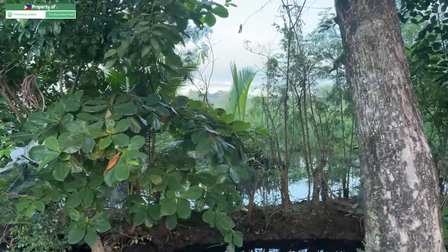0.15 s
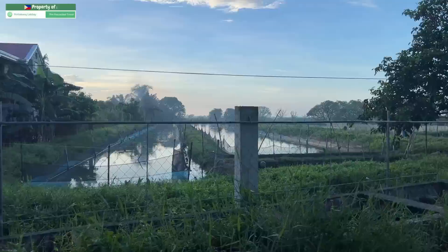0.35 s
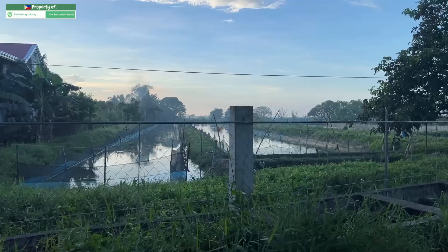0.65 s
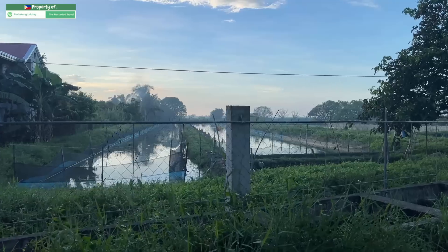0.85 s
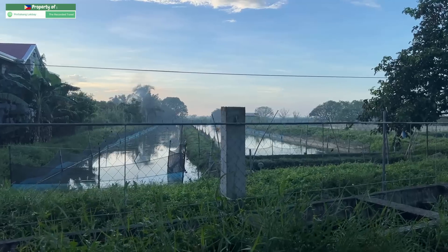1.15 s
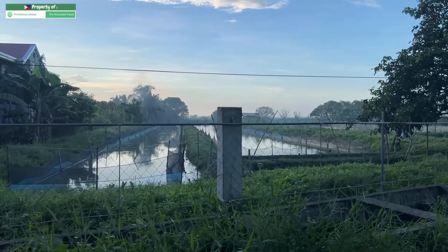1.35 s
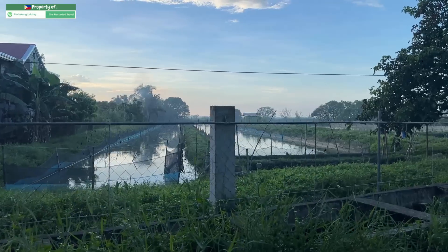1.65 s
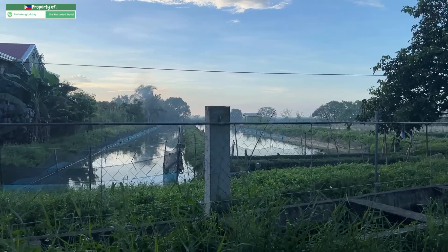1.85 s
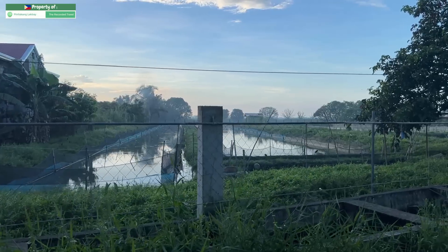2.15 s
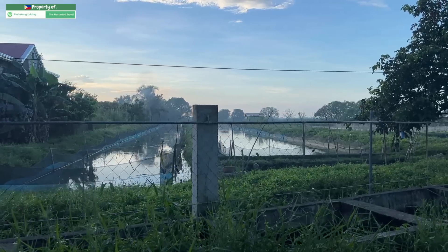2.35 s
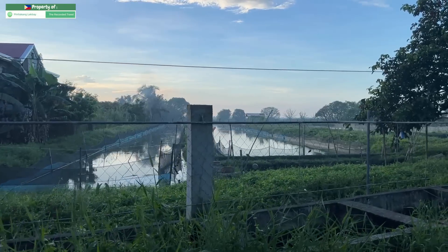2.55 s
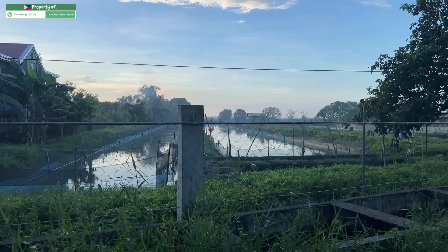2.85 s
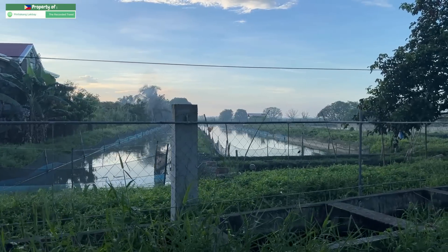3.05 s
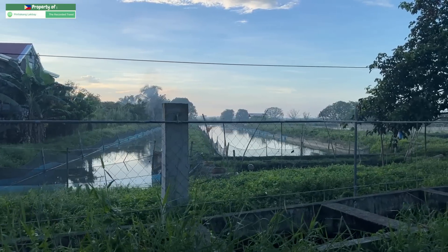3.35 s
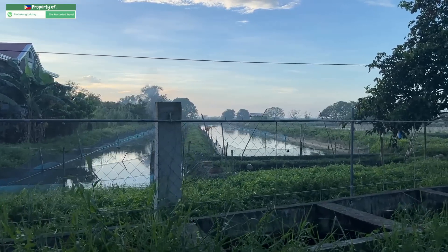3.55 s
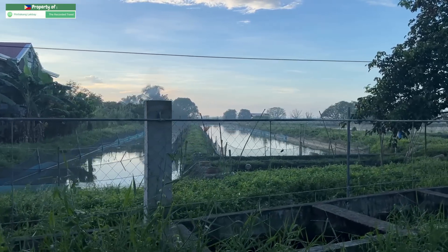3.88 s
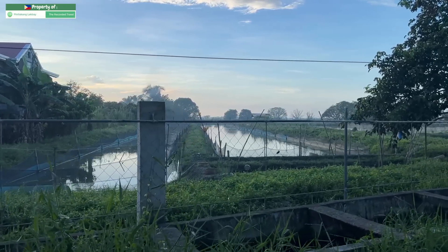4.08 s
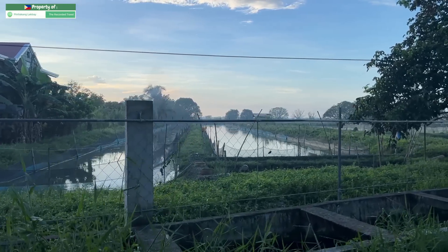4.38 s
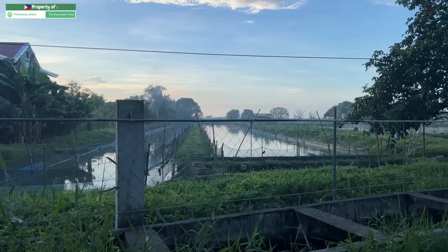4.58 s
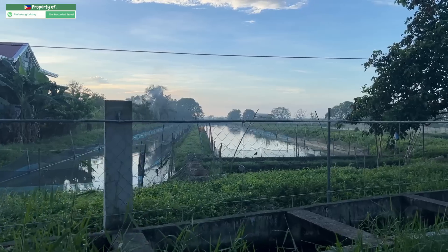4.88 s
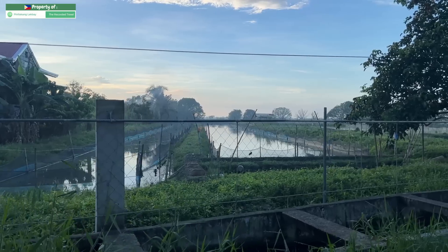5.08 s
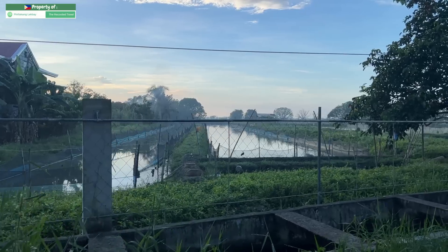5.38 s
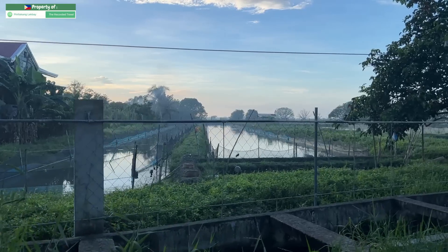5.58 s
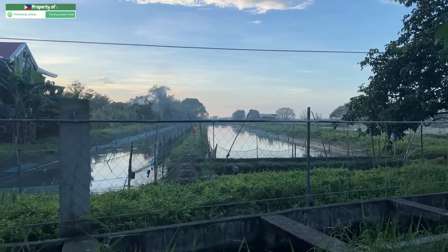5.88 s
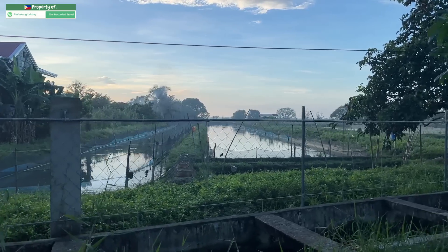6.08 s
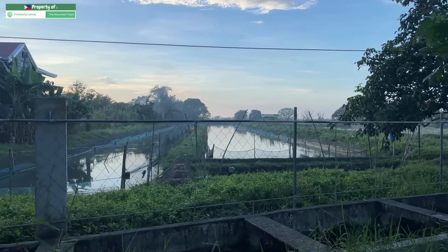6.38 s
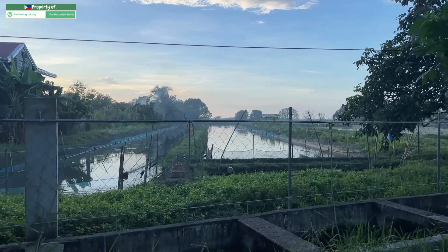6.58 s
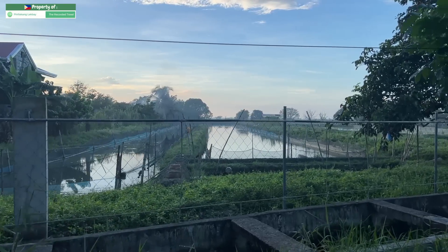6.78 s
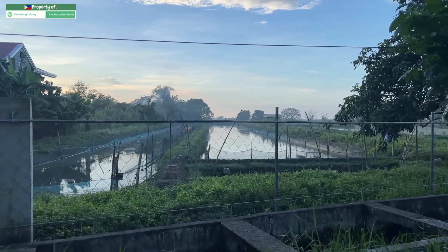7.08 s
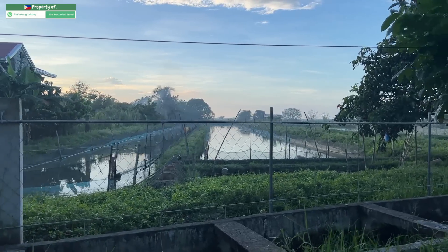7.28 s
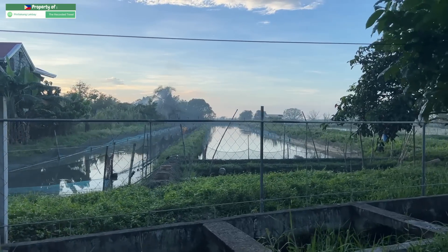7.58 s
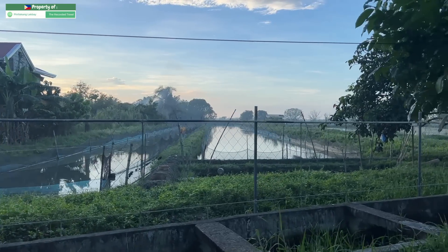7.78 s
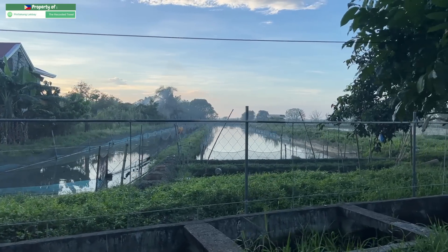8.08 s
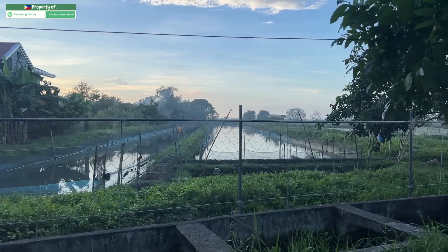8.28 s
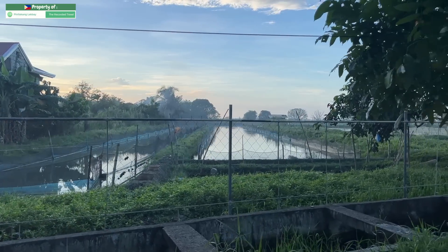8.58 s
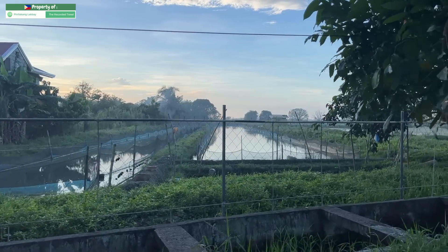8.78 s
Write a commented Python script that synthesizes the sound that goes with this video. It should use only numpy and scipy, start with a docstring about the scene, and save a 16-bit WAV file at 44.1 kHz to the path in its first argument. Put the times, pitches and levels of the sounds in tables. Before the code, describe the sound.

An open-air scene by ponds at a village edge, in stereo. A steady low rumble and very faint leaf rustle run throughout; a thin, high, fast-throbbing insect trill is barely there, then rises at about 0.3 s and stays. A dog barks in short hoarse yaps of about a tenth of a second, arching in pitch, with quick echoes from walls and a faint falling grunt: at 0, 0.2, 0.35, 0.6 and 0.85 s, then 2.0, 2.3, 2.6 and 3.3 s, singly at 4.5 and 5.7 s, and finally 7.9, 8.15 and 8.5 s. Farther off, an animal whimpers around 1.8-2.2 and 3.5-3.9 s, very faintly near 6.6-7.1 s. Faint whistled bird notes glide from 2.3 to 5.4 s, with scattered chirps. Small dry ticks fall close by, the strongest knock at 2.5 s and a bright snap at 4.4 s.

```python
"""Ponds at a village edge: a dog barks in short bursts, an animal whines farther off.
Barks are harmonics swept through throat, mouth and muzzle resonances, plus rasp and a trailing grunt.
Whines, whistled bird notes and chirps are nearly pure gliding tones; near ticks are decaying noise.
Throbbing noise makes an insect trill, faint at first; shaped noise makes rumble and faint leaf rustle.
Wall echoes return the barks; yard reverberation carries barks, whines and birds."""
import sys
import numpy as np
from scipy import signal
from scipy.fft import rfft, irfft
from scipy.io import wavfile
from scipy.ndimage import uniform_filter1d, minimum_filter1d, map_coordinates

SR = 44100
rng = np.random.default_rng(int(sys.argv[2]) if len(sys.argv) > 2 else 0)


def wrap_up_sound(samples):
    """Save the sound to the file named by the first command line argument, as 16-bit audio."""
    columns = np.atleast_2d(samples).T
    # keep every value between -1 and 1, then stretch to whole-number steps
    tamed = np.clip(columns, -1, 1)
    steps = np.round(tamed * 32767).astype(np.int16)
    wavfile.write(sys.argv[1], SR, steps)


N = 393809
TIME = np.arange(N) / SR
FREQS = np.maximum(np.fft.rfftfreq(N, 1 / SR), 1)
SIDES = np.array([[1], [-1]])   # left, right

# All levels in the tables are relative.
# rumble and open air: (frequency [Hz], density [dB per Hz])
AIR_SPECTRUM = [(12, -39), (20, -76), (40, -7), (70, 0), (124, -3.5), (150, -7.5), (370, -21.5),
                (407, -22.5), (595, -23.5), (736, -32), (1130, -28.5), (1330, -39), (3060, -42.5),
                (4160, -39.5), (5800, -52), (7540, -42), (12800, -120)]
# insect chorus: (frequency [Hz], density [dB per Hz])
CHORUS_SPECTRUM = [(4500, -52), (6000, -25.5), (6600, -12.5), (6950, -2.5), (7200, 1.5), (7450, 0),
                   (7800, -9.5), (8600, -9.5), (9100, -1), (9700, -41.5), (10700, -15), (12000, -42.5),
                   (14300, -31.5), (15800, -35)]
# leaf rustle over time: (time [s], level [dB])
RUSTLE_LEVEL = [(0.0, -43), (0.17, -44.5), (0.87, -47), (1.49, -53), (2.49, -41), (2.71, -49), (4.0, -45.5),
                (4.15, -51.5), (5.25, -52), (6.42, -57), (8.43, -50.5), (8.93, -59)]
# leaf rustle: (frequency [Hz], density [dB per Hz])
RUSTLE_SPECTRUM = [(300, 7), (900, -5.5), (1600, 1.5), (3000, -4), (5000, -1.5), (7000, 0.5), (12000, -60)]
# stereo likeness of the noise fields: (frequency [Hz], left-right likeness [0-1])
STEREO_LIKENESS = [(60, 0.9), (110, 1), (200, 0.69), (400, 0.7), (700, 0.24), (1200, 0.54), (2000, 0.97),
                   (3500, .15), (5500, 0.115), (7000, 0.49), (7700, 1), (15000, 1)]
# phase by which the left leads: (frequency [Hz], phase [rad])
LEFT_LEAD = [(60, -0.5), (130, -0.02), (200, -0.9), (400, -0.9), (700, -4), (1200, -4), (2000, -5),
             (5500, -5.5), (7000, -5.5), (7300, -6.5), (8700, -7.5), (10700, -17), (14300, -11.5)]
# stereo balance: (frequency [Hz], left minus right [dB])
STEREO_TILT = [(60, 0), (130, -2), (290, -1), (640, 1.5), (1410, -1.5), (3100, 4.5), (6820, 4.5),
               (15000, -4.5)]
# yard decay: (frequency [Hz], time to fall 60 dB [s])
YARD_DECAY = [(300, 0.5), (600, 0.86), (1700, 0.79), (4000, 1), (10000, 0.25)]
# echoes from houses and the tree line: (delay [s], left [dB], right [dB])
WALL_ECHOES = [(.052, -16, -20), (.088, -16.5, -16.5), (.118, -25, -28), (.167, -23.5, -26)]
# clearest near ticks: (time [s], knock level [dB], snap level [dB])
CLEAR_TICKS = [(.174, -31, -35), (.784, -36, -34), (1.649, -28.5, -60), (2.488, -12, -45),
               (2.529, -26.5, -51), (3.003, -30, -26), (3.055, -26.5, -22.5), (3.164, -25.5, -43),
               (3.234, -20.5, -33), (3.99, -31, -29.5), (4.434, -62, -14), (4.457, -42, -29),
               (5.201, -32.5, -25), (6.243, -31.5, -41), (6.899, -39, -31.5), (7.527, -35, -26.5)]
# dull part of a tick: (frequency [Hz], level [dB])
KNOCK_SPECTRUM = [(200, -7.5), (600, 8.5), (1000, 12), (1400, 15.5), (2000, 8), (3000, -44), (6000, -83)]
# bright part of a tick: (frequency [Hz], level [dB])
SNAP_SPECTRUM = [(800, -23), (2000, 8), (4000, 8.5), (7000, -3.5), (10000, -22), (15000, -24)]
# other small birds, far off: (start [s], length [s], pitch [Hz], sweep [Hz], level [dB])
CHIRP_NOTES = [(0.062, 0.036, 4550, -500, -37), (0.089, 0.077, 4075, -500, -40),
               (1.064, 0.051, 5140, -500, -46), (1.125, 0.045, 3950, 1100, -45),
               (4.362, 0.08, 5540, 395, -47), (5.363, 0.04, 2520, -100, -52),
               (5.466, 0.086, 5880, -600, -44.5), (5.56, 0.028, 2490, 0, -45),
               (6.298, 0.066, 4460, 188, -57), (6.4, .07, 5970, -400, -46.5), (6.75, 0.11, 4570, 294, -52),
               (7.134, .13, 2540, -100, -52.5), (7.296, 0.094, 4680, -400, -53.5),
               (8.42, 0.23, 6030, -300, -48)]
# long whistled song notes: (start [s], length [s], pitch [Hz], glide [Hz], level [dB])
SONG_NOTES = [(2.34, 0.27, 5880, -650, -45.5), (2.86, 0.48, 3645, 220, -47.5), (3.38, 0.25, 3760, 30, -46),
              (3.68, .26, 5220, -300, -44.5), (3.88, 0.27, 4980, 6.5, -41.5), (4.28, .5, 3585, -120, -48.5),
              (4.88, .39, 3118, -220, -49), (5.25, .12, 3080, 357, -47)]
# far whines: (start [s], length [s], top pitch [Hz], level [dB])
WHINE_NOTES = [(1.789, .15, 1131, -35), (1.935, .08, 1040, -31.5), (2.113, 0.11, 1080, -33),
               (3.471, 0.111, 1170, -35.5), (3.564, 0.057, 1110, -37), (3.627, 0.045, 1084, -36),
               (3.688, 0.047, 970, -41), (3.793, .145, 1062, -38), (6.622, 0.21, 1189, -51.5),
               (6.969, 0.13, 1150, -51)]
# barks: (start [s], top [s], end [s], top pitch [Hz], throat [dB], mouth [Hz], mouth at opening [dB],
#         mouth at closing [dB], muzzle [dB], rasp [dB], relative roughness [0-1], left lead [rad])
BARK_ROWS = [(-.059, 0.022, .09, 528.3, -13.5, 810, -14, -12.5, -33, -42.5, 0.14, 2.02),
             (0.209, 0.297, .347, 492, -17, 815, -17, -10.5, -30.5, -58, 0.2, 1.93),
             (0.341, 0.388, .459, 554.8, -9.5, 1022, -7, -4.5, -10, -37, 0.13, 1.47),
             (.587, 0.671, .744, 528.4, -17, 843, 1, -8.5, -16, -42, 0.21, 1.4),
             (0.847, 0.921, .986, 517, -22, 873, -0.5, -5, -16, -47, 0.21, 1.14),
             (1.979, 2.07, 2.122, 587.6, -13, 953, 3, 1, -15.5, -41, 0.37, 1.39),
             (2.269, 2.362, 2.42, 558.2, -12.5, 982, 2.5, -2.5, -18, -39.5, 0.24, 1.5),
             (2.598, 2.695, 2.738, 565.2, -9, 1030, 2.5, -3, -17, -31.5, 0.1, 1.56),
             (3.265, 3.356, 3.415, 565.2, -14.5, 950, 0.5, -26.5, -26.5, -32.5, 0.62, 2.05),
             (4.525, 4.625, 4.69, 605.3, -3, 1160, -8.5, -27, -16.5, -27, 0.09, 2.2),
             (5.696, 5.788, 5.845, 594.3, -3.5, 1057, -4.5, -24, -25, -25.5, 0.1, 2.39),
             (7.853, 7.955, 8.02, 604.6, -3.5, 1120, -11.5, -24, -30, -27.5, 0.18, 2.16),
             (8.149, 8.222, 8.305, 532, -12.5, 920, -14.5, -15.5, -20, -39.5, 0.23, 2.19),
             (8.502, 8.585, 8.65, 526.5, -15, 994, -14, -13.5, -21, -33.5, 0.39, 2.23)]
# rasp colour: (frequency [Hz], level [dB])
RASP_SPECTRUM = [(300, -7.5), (900, 5), (1400, 13), (2080, 7), (2600, -6), (3200, 2), (3700, -13.5),
                 (4400, -4), (5400, -9.5), (6500, 1.5), (8500, -15), (10000, -20), (15000, -23)]
# bark balance, slightly right early and left late: (time [s], left minus right [dB])
BARK_BALANCE = [(0, -1), (8.9, 2)]


def from_db(db):
    """Decibels to gain."""
    return 10 ** (np.asarray(db) / 20)


def rms_one(x):
    """Scale to unit power."""
    return x / np.sqrt(np.mean(x ** 2) + 1e-20)


def in_time(rows, t_s=TIME):
    """Interpolate a two-column curve at given times."""
    times_s, values = np.transpose(rows)
    return np.interp(t_s, times_s, values)


def at_hz(points, hz):
    """Read a spectrum on a log-frequency axis."""
    points_hz, values = np.transpose(points)
    return np.interp(np.log(hz), np.log(points_hz), values)


def coloured(x, spectrum):
    """Shape a sound by a spectrum."""
    hz = np.maximum(np.fft.rfftfreq(x.shape[-1], 1 / SR), 1)
    return irfft(rfft(x) * from_db(at_hz(spectrum, hz)), x.shape[-1])


def wander(t, rate_hz):
    """Smooth random curve through normal knots of unit spread, rate_hz knots a second."""
    knots = rng.standard_normal(4096)
    return map_coordinates(knots, [(t - t[0]) * rate_hz], order=3, mode="wrap")


def complex_wander(t, rate_hz, imag_rate_hz):
    """Random drift of both amplitude and phase."""
    return wander(t, rate_hz) + 1j * wander(t, imag_rate_hz)


def add(out, sound, start_s):
    """Mix a sound in at a time."""
    i = round(start_s * SR)
    lo, hi = max(i, 0), min(i + sound.shape[-1], N)
    out[..., lo:hi] += sound[..., lo - i:hi - i]


def field(spectrum):
    """Stereo noise from all around, with likeness, phase and balance set by frequency; rms 1."""
    mid, side = rfft(rng.standard_normal((2, N)))
    alike = np.clip(at_hz(STEREO_LIKENESS, FREQS), 0, 1)
    balance = from_db(.5 * SIDES * at_hz(STEREO_TILT, FREQS))
    lead = np.exp(.5j * SIDES * at_hz(LEFT_LEAD, FREQS))
    pair = np.sqrt(1 + alike) * mid + SIDES * np.sqrt(1 - alike) * side
    return rms_one(irfft(pair * balance * lead * from_db(at_hz(spectrum, FREQS)), N))


def yard(x, near_db, far_db, near_t60_s=.13):
    """Quick reflections from ground and walls, plus a thin tail from trees and houses."""
    t = np.arange(SR) / SR
    tail_noise, near_noise = rng.standard_normal((2, 2, SR))
    tail = 0
    edges_hz = np.geomspace(150, 15000, 8)
    for low_hz, high_hz in zip(edges_hz, edges_hz[1:]):
        sos = signal.butter(2, [low_hz, high_hz], "band", fs=SR, output="sos")
        t60_s = at_hz(YARD_DECAY, np.sqrt(low_hz * high_hz))
        tail = tail + signal.sosfilt(sos, tail_noise) * from_db(-60 * t / t60_s)
    tail = tail * np.clip(t / .0057, 0, 1)
    near = near_noise * from_db(-60 * t / near_t60_s) * (t > .004)
    echo = (from_db(near_db) * rms_one(near) + from_db(far_db) * rms_one(tail)) / np.sqrt(SR)
    return x + signal.fftconvolve(x, echo, axes=1)[:, :N]


def walls(x):
    """Separate echoes, dulled by a 1390 Hz low-pass."""
    out = x.copy()
    dull = signal.sosfilt(signal.butter(2, 1390, fs=SR, output="sos"), x)
    for delay_s, left_db, right_db in WALL_ECHOES:
        add(out, dull * from_db([[left_db], [right_db]]), delay_s)
    return out


def resonance(hz, centre_hz, width_hz):
    """Gain of one resonance: 1 on top, half at width_hz to either side."""
    return 1 / (1 + ((hz - centre_hz) / width_hz) ** 2)


def glides(rows, swell_db):
    """Notes that slide evenly in pitch, swell_db softer at the ends than in the middle."""
    notes = []
    for start_s, length_s, hz, glide_hz, db in rows:
        along = np.linspace(0, 1, round(length_s * SR))
        notes.append((start_s, hz + glide_hz * along, db - swell_db * (2 * along - 1) ** 2))
    return notes


def tones(notes, overtone_db, waver, waver_rate_hz, flutter_db, edge_s):
    """Sines with second and third harmonics, wavering in pitch (fraction) and level."""
    out = np.zeros(N)
    for start_s, hz, db in notes:
        t = np.arange(len(hz)) / SR
        phase = 2 * np.pi * np.cumsum(hz * (1 + waver * wander(t, waver_rate_hz))) / SR
        gate = np.clip(np.minimum(t, t[-1] - t) / edge_s, 0, 1)
        overtones = np.sin(2 * phase) + .5 * np.sin(3 * phase)
        wave = np.sin(phase) + from_db(overtone_db) * overtones
        level = from_db(db + flutter_db * wander(t, 55.8))
        add(out, np.sqrt(2) * gate * level * wave, start_s)
    return out


def rumble():
    """Low-weighted noise whose level drifts slightly."""
    return from_db(-33 + wander(TIME, 7.3)) * field(AIR_SPECTRUM)


def rustle():
    """Faint leaf noise with quick and slow level swells."""
    swell_db = 2.25 * wander(TIME, 25) + 1.8 * wander(TIME, 4.1)
    return from_db(in_time(RUSTLE_LEVEL) + 3.5 + swell_db) * field(RUSTLE_SPECTRUM)


def insects():
    """Wing rasp as noise near 7 kHz, throbbing with wing strokes; faint, then quickly louder."""
    faint_db, full_db = -49.5, -36.5
    rise_at_s, rise_over_s = .32, .054
    stroke_hz = 58.7 * (1 + .0302 * wander(TIME, 14))
    strokes = np.sin(2 * np.pi * np.cumsum(stroke_hz) / SR)
    db = np.interp(TIME, [rise_at_s, rise_at_s + rise_over_s], [faint_db, full_db])
    db = db + wander(TIME, 30)   # 1 dB flicker
    return from_db(db) * (1 + .16 * strokes) * field(CHORUS_SPECTRUM)


def ticks():
    """Dull knock plus brighter snap, both decaying noise; faint ticks fall at random."""
    count, attack_s = 14, .0006
    out, t = np.zeros((2, N)), np.arange(4096) / SR
    faint_s = rng.uniform(1.6, 7.9, count)
    faint_db = [-38, -37] + 3 * rng.standard_normal((count, 2))   # knock, snap
    for start_s, knock_db, snap_db in [*CLEAR_TICKS, *np.column_stack([faint_s, faint_db])]:
        parts = ((KNOCK_SPECTRUM, knock_db + 3, .016), (SNAP_SPECTRUM, snap_db - 9, .064))
        for spectrum, level_db, t60_s in parts:
            noise = rng.standard_normal(len(t)) + .5 * rng.standard_normal((2, len(t)))
            envelope = np.minimum(t / attack_s, 1) * from_db(level_db - 60 * t / t60_s)
            add(out, envelope * rms_one(coloured(noise, spectrum)), start_s)
    return out


def chirps():
    """Short twittering sweeps, blurred by rapid pitch waver."""
    return from_db(-2.5) * tones(glides(CHIRP_NOTES, swell_db=0), overtone_db=-48, waver=.094,
                                 waver_rate_hz=700, flutter_db=4, edge_s=.0059)


def song():
    """Whistled notes: nearly pure glides, loudest in the middle."""
    return tones(glides(SONG_NOTES, swell_db=6), overtone_db=-45, waver=.0097,
                 waver_rate_hz=370, flutter_db=1.5, edge_s=.023)


def whines():
    """Pitch scoops up, sags and drops away; level flares at the mouth resonance."""
    scoop, sag_per_s, drop = .2, .3, .14   # fractions of the top pitch
    rise_s, fall_s = .062, .012
    notes = []
    for start_s, length_s, top_hz, db in WHINE_NOTES:
        t = np.arange(0, length_s, 1 / SR)
        rising = np.clip(1 - t / min(rise_s, length_s / 2), 0, 1)
        falling = np.clip(1 - (length_s - t) / fall_s, 0, 1)
        sag = sag_per_s * np.maximum(t - rise_s, 0)
        hz = top_hz * (1 - scoop * rising - sag - drop * falling)
        flare_db = 10.5 * resonance(hz, centre_hz=945, width_hz=37)
        fade_db = 8 * (rising + falling)
        notes.append((start_s, hz, db + flare_db - fade_db))
    return tones(notes, overtone_db=-31.5, waver=.0082, waver_rate_hz=62, flutter_db=1, edge_s=.00604)


def bark_rasp(t, phase, arc, rasp_db):
    """Gritty high harmonics plus breath noise pulsed at the pitch, brightest early in the bark."""
    buzz = 0
    for k in range(2, 18):
        jittered = k * phase + rng.uniform(0, 2 * np.pi) + .65 * wander(t, 250)
        buzz = buzz + (1 + .92 * wander(t, 121)) * np.cos(jittered)
    air = rng.standard_normal(len(t)) * (1 + 2.4 * np.cos(phase))
    rasp = rms_one(coloured(buzz, RASP_SPECTRUM)) + .48 * rms_one(coloured(air, RASP_SPECTRUM))
    level_db = rasp_db + 5.5 - 3.5 * arc - 2 * arc ** 2 + .9 * wander(t, 140)
    return rms_one(rasp) * from_db(level_db)


def bark(row):
    """Pitch arcs up and down; each harmonic flares as it sweeps through a resonance."""
    (start_s, top_s, end_s, top_hz, throat_db, open_hz, open_db, close_db,
     muzzle_db, rasp_db, rough, lead_rad) = row
    close_hz = .858 * open_hz   # the mouth resonance sinks as the jaws close
    t = np.arange(round(start_s * SR), round((end_s + .012) * SR)) / SR
    arc = np.where(t < top_s, (t - top_s) / (top_s - start_s), (t - top_s) / (end_s - top_s))
    closing = np.clip(.5 + arc, 0, 1)   # arc: -1 at start, 0 at top, 1 at end
    pitch_hz = top_hz * np.maximum(1 - .42 * np.abs(arc) ** 2.4, .3)
    rough = rough * (1.44 + .98 * closing)   # the voice breaks up as it goes
    phase = 2 * np.pi * np.cumsum(pitch_hz * (1 + .03 * rough * wander(t, 348.5))) / SR
    effort = from_db(-11 * arc ** 4) * np.minimum((t - t[0]) / .009, 1)

    mouth_hz = open_hz + closing * (close_hz - open_hz)
    mouth_db = open_db + closing * (close_db - open_db)
    muzzle_hz = 1670 - 280 * (closing - .5)
    # the wider the mouth opens, the later the low ring comes
    lag = np.clip((open_db - throat_db + 3) / 18, .2, 1.3)
    throat = from_db(throat_db + 13 * np.minimum(arc + .068, 0) * lag)

    def tract(hz):
        """Throat, mouth and muzzle resonances; little passes above 2300 Hz."""
        gain = throat * resonance(hz, top_hz + 15, width_hz=97.5)
        gain = gain + from_db(mouth_db) * resonance(hz, mouth_hz, width_hz=64.6)
        gain = gain + from_db(muzzle_db) * resonance(hz, muzzle_hz, width_hz=47)
        return gain / (1 + (hz / 2300) ** 12)

    voice = 0
    for k in range(1, 6):
        flutter = 1 + .69 * rough * complex_wander(t, 163.3, 160.6)
        voice = voice + tract(k * pitch_hz) * flutter * np.exp(1j * k * phase)
        # uneven beating of the folds fills the gaps between the harmonics
        between = complex_wander(t, 368.8, 367.9) * np.exp(1j * (k + .5) * phase)
        growl = .65 * rough * effort * np.minimum(tract((k + .5) * pitch_hz), .3)
        voice = voice + growl * between
    half_pitch = complex_wander(t, 201.2, 199) * np.exp(.5j * phase)
    voice = voice + from_db(throat_db - 32) * half_pitch
    voice = voice + signal.hilbert(bark_rasp(t, phase, arc, rasp_db))
    ragged = from_db(2.4 * np.sqrt(rough) * wander(t, 110.7))
    balance = from_db(.5 * in_time(BARK_BALANCE, top_s) * SIDES)
    return np.real(effort * ragged * voice * np.exp(.5j * lead_rad * SIDES)) * balance, t[0]


def dog():
    """All barks in stereo, each trailing off in a faint falling grunt."""
    out = np.zeros((2, N))
    for row in BARK_ROWS:
        add(out, *bark(row))
    # start [s], length [s], pitch [Hz], glide [Hz], level [dB]
    grunt_rows = [(end_s, .13, 291.6, -130, -43.5) for _, _, end_s, *_ in BARK_ROWS]
    return out + tones(glides(grunt_rows, swell_db=1), overtone_db=-6.5, waver=.08,
                       waver_rate_hz=150, flutter_db=4, edge_s=.0075)


def scene():
    """Background noise, near ticks, far whines and birds, and the dog."""
    background = rumble() + rustle() + insects()
    birds = (song() + chirps()) * from_db([[-1], [-3]])   # left, right
    far = yard(whines() * from_db(-2) + birds, near_db=2, far_db=-5)
    barks = from_db(2) * yard(walls(dog()), near_db=-10, far_db=-21.5, near_t60_s=.16)
    return background + ticks() + far + barks


def record(dry):
    """A quick limiter holds peaks to 1.4, those above 1 clip, then a low-pass cuts the top."""
    ceiling, hold, stop_hz = 1.4, round(.005 * SR), 16600   # hold in samples
    needed = np.minimum(1, ceiling / (np.abs(dry).max(axis=0) + 1e-9))
    gain = uniform_filter1d(minimum_filter1d(needed, size=hold), size=hold)
    low_pass = signal.cheby2(12, 70, stop_hz, fs=SR, output="sos")
    return signal.sosfilt(low_pass, np.clip(dry * gain, -1, 1))


dry = scene()
out = record(dry)
wrap_up_sound(out)
```